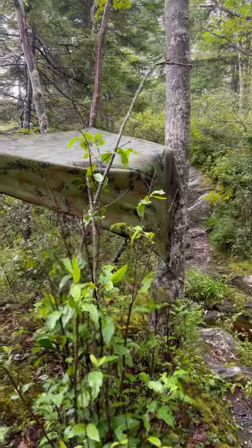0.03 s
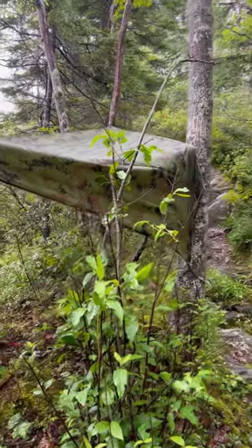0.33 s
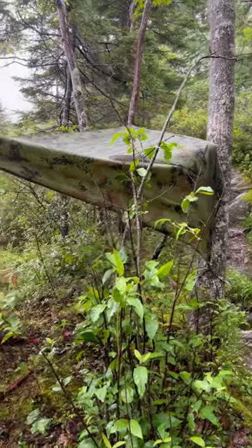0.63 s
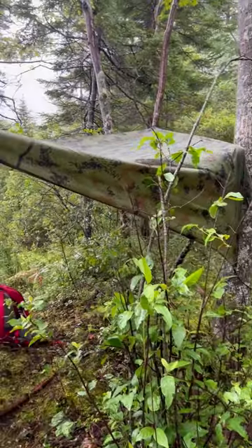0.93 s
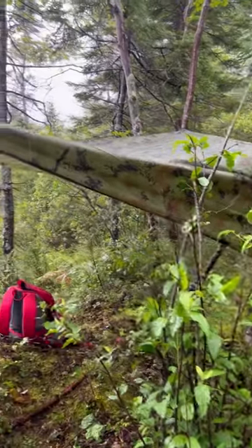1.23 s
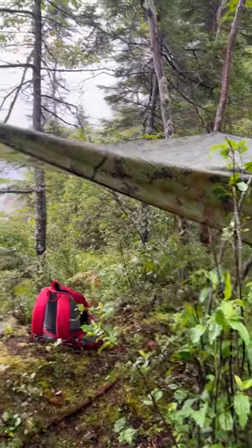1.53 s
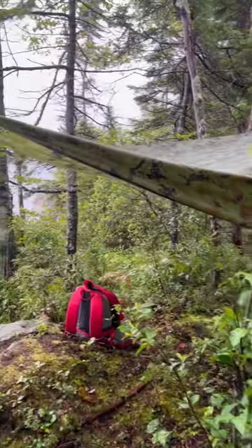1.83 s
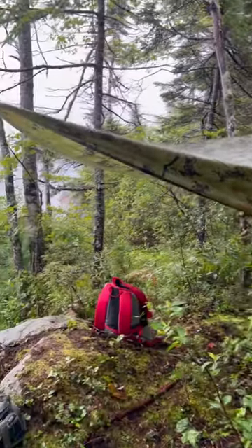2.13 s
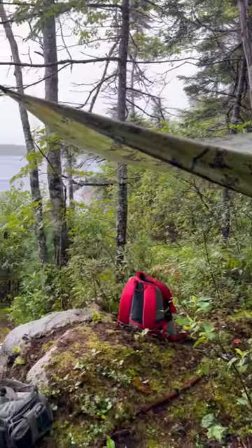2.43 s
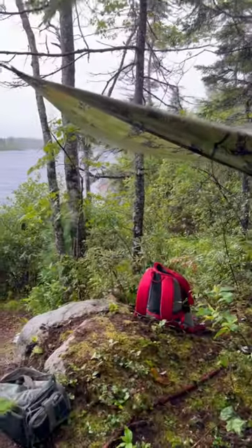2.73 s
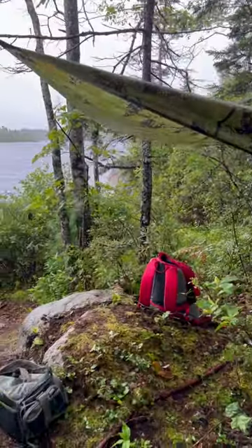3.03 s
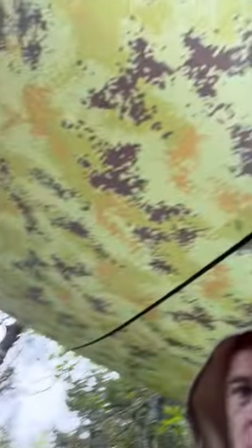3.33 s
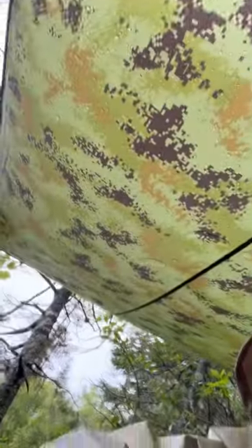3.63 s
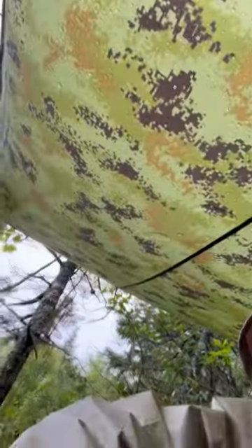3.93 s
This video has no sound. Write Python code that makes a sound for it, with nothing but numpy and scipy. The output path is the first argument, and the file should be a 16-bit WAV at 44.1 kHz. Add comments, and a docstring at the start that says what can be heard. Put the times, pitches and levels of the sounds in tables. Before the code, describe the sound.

Steady rain falls in a forest, a soft hiss with small ticks on leaves and low drips. The microphone moves under a stretched tarp, where the patter turns loud and close, with heavy drops tapping the fabric.

```python
"""Steady rain in a wet forest, heard while walking in under a stretched tarp.
From the start far leaves hiss, near leaves tick, fat drips thud and stirring air rumbles faintly.
Each drop on the taut fabric is a tick and a quick falling chirp, as its short waves outrun its long ones.
Around two seconds a dip glides down through the hiss and the nearing tarp's patter fills out from above.
After three seconds the tarp is overhead: the forest recedes and the patter is loud and close."""
import sys
import numpy as np
from scipy import signal
from scipy.fft import rfft, irfft
from scipy.io import wavfile
from scipy.ndimage import uniform_filter1d

SR = 44100
rng = np.random.default_rng(int(sys.argv[2]) if len(sys.argv) > 2 else 0)


def unload_wav(signal):
    """Save mono or channel-first audio to the path in sys.argv[1] as 16-bit WAV at rate SR, clipped to [-1, 1]."""
    wavfile.write(
        sys.argv[1],
        SR,
        np.round(np.clip(np.atleast_2d(signal).T, -1, 1) * 32767).astype(np.int16),
    )


N = 176400
SNAP_LOW_HZ, CUTOFF_HZ = 9500, 15900
DROP_S = .0025  # nominal length of one impact


def amp(db):
    """Amplitude grows tenfold with every 20 decibels."""
    return 10 ** (np.asarray(db) / 20)


def unit(x):
    """Normalisation to an rms of 1."""
    return x / np.sqrt(np.mean(x ** 2) + 1e-20)


def at_hz(points, hz):
    """Interpolation of a curve on a logarithmic frequency axis."""
    known_hz, value = np.transpose(points)
    return np.interp(np.log(hz + 1), np.log(known_hz + 1), value)


def level(points):
    """An amplitude envelope from points in seconds and dB."""
    return amp(np.interp(np.arange(N) / SR, *np.transpose(points)))


def add(mix, start_s, sound):
    """Superposition: a sound adds to the mix from its start time."""
    part = mix[:, max(round(start_s * SR), 0):][:, :sound.shape[-1]]
    part += sound[..., :part.shape[1]]


def low_cut(x, hz, order):
    """A high-pass filter attenuates the bass below hz."""
    return signal.sosfilt(signal.butter(order, hz, "high", fs=SR, output="sos"), x)


def wash(spectrum, coherence, flicker_db, size, patch_db=2):
    """Partly coherent stereo noise, modulated by drifting spectral patches and a shared flicker."""
    hz = np.fft.rfftfreq(size, 1 / SR)
    frames = N // (size // 4) + 6
    noise = rng.standard_normal((5, frames, len(hz)))
    left, independent = noise[0] + 1j * noise[1], noise[2] + 1j * noise[3]
    patches = unit(uniform_filter1d(uniform_filter1d(noise[4], size=10, axis=0), size=7, axis=1))
    flicker = unit(uniform_filter1d(rng.standard_normal(frames), size=3))[:, None]
    alike = np.clip(at_hz(coherence, hz), -1, 1)
    bins = np.array([left, alike * left + np.sqrt(1 - alike ** 2) * independent])
    bins *= amp(at_hz(spectrum, hz) + patch_db * patches + flicker_db * flicker)
    return unit(signal.istft(bins.transpose(0, 2, 1), nperseg=size, noverlap=size * 3 // 4)[1][:, :N])


def shower(per_s, spread_db):
    """A Poisson process of impacts, most small and a few large."""
    return amp(spread_db * np.minimum(rng.exponential(1, N), 4.5)) * (rng.random(N) < per_s / SR)


def forest():
    """Incoherent summation: impacts on countless far leaves merge into an even hiss."""
    # Envelope of the hiss. Each row: time in seconds, level in dB.
    envelope = [(0,-48.5),(.5,-48.5),(1.3,-51),(3,-49.5),(3.3,-55)]
    # Its spectrum. Each row: frequency in Hz, relative density in dB.
    spectrum = [(100,-12),(170,3),(300,2),(600,-2),(3000,-2.3),(4300,1.5),(6500,-.5),(9000,-3),(12000,-6.5),(16000,-9)]
    # Its width. Each row: frequency in Hz, left-right correlation from -1 to 1.
    coherence = [(290,.75),(640,.25),(3000,.05),(5500,.15),(7500,0),(11500,-.6)]
    return level(envelope) * wash(spectrum, coherence, flicker_db=-.4, size=512)


def leaves(count=30, per_s=1200, low_hz=2340, high_hz=8750, level_db=-60.5):
    """Damped resonance: each struck leaf rings for about one cycle, at its own pitch and place."""
    out, t = np.zeros((2, N)), np.arange(500) / SR
    for hz in np.geomspace(low_hz, high_hz, count):
        tick = np.sin(2 * np.pi * hz * t) * np.exp(-hz * t) * np.sqrt(hz)
        ticks = signal.oaconvolve(shower(per_s / count, spread_db=1), tick)[:N]
        pan = rng.random() * np.pi / 2
        out += [np.cos(pan) * ticks, np.sin(pan) * np.roll(ticks, rng.integers(-10, 10))]
    return amp(level_db) * unit(low_cut(out, low_hz / 2, order=2))


def rumble():
    """Modulated low noise, cut out for about a second as by a wind filter, then louder under the tarp."""
    # Envelope of the rumble. Each row: time in seconds, level in dB.
    envelope = [(0,-64),(.6,-64),(1.07,-65),(1.14,-100),(1.85,-106),(2.1,-62),(2.25,-58.5),(2.5,-59.5),(3.1,-54.5),(3.7,-54.5),(3.83,-53)]
    # Its spectrum. Each row: frequency in Hz, relative density in dB.
    spectrum = [(20,-48),(60,-9.5),(150,-9),(260,-13),(1200,-72)]
    return level(envelope) * wash(spectrum, coherence=[(20, .75), (1000, .75)], flicker_db=2.5, size=2048)


def spray(low_hz, high_hz, t, rise_s=.0004, decay_s=.0005, splash_s=.003, splash_db=-17):
    """A brief impact is broadband: a burst of noise within a band, then a faint splash."""
    band = signal.butter(2, [low_hz, high_hz], "band", fs=SR)
    decay = np.exp(-t / decay_s) + amp(splash_db) * np.exp(-t / splash_s)
    envelope = (1 - np.exp(-t / rise_s)) * decay
    return unit(signal.lfilter(*band, rng.standard_normal(len(t)) * envelope))


def fabric_chirp(pitch, t, sweep_hz=2700, end_hz=280, fall_s=.00095, rise_s=.00045, decay_s=.0014):
    """Dispersion: slower, longer waves cross the fabric last, so the pitch falls; the edges echo it."""
    detune, size = np.exp(.12 * np.clip(rng.standard_normal(2), -2, 2))
    hz = pitch * detune * (end_hz + sweep_hz / (1 + (t / (fall_s * size)) ** 1.524))
    envelope = (1 - np.exp(-t / rise_s)) * np.exp(-t / (decay_s * size))
    wave = np.sin(2 * np.pi * np.cumsum(hz) / SR) * envelope
    delays_s, signs = rng.uniform(.0006, .006, size=4), rng.choice([-1, 1], size=4)
    reflections = sum(sign * np.interp(t - s, t, wave, left=0) for s, sign in zip(delays_s, signs))
    return wave + amp(-12) * reflections


def tarp_drop(chirp_db, tick_db, pitch, echo_db=-6, echo_s=.007):
    """The tarp's impulse response: a crisp tick and a chirp, scattered between fabric and ground."""
    t = np.arange(1600) / SR
    chirp = fabric_chirp(pitch, t)
    tick = spray(2980, 8300, t) + amp(-13.5) * spray(SNAP_LOW_HZ, CUTOFF_HZ, t)
    direct = (amp(chirp_db) * unit(chirp) + amp(tick_db) * unit(tick)) * np.sqrt(DROP_S * SR / len(t))
    lag_s = 8e-6 * rng.standard_normal()  # the two sides hear it at slightly different times
    right = irfft(rfft(direct) * np.exp(-2j * np.pi * np.fft.rfftfreq(len(t), 1 / SR) * lag_s))
    scatter = rng.standard_normal((2, len(t))) * np.exp(-t / echo_s) * (1 - np.exp(-t / .0022))
    scatter *= amp(echo_db) / np.linalg.norm(scatter[0])
    return np.array([direct, right]) + signal.fftconvolve(scatter, direct[None], axes=1)[:, :len(t)]


def patter(spots=36, per_s=1600, pitch_spread=.353, pan_db=3):
    """Shot noise: small drops excite many spots of the tarp, louder as it comes overhead."""
    # Envelope of the patter. Each row: time in seconds, level in dB before shading.
    envelope = [(0,-52),(1.2,-50.5),(1.9,-51.5),(2.2,-51),(3.08,-50),(3.1,-43.5),(3.19,-45.5),(3.28,-40.5),(3.4,-43),(3.48,-41.5),(3.64,-43.5),(3.81,-40.5)]
    # Its spectrum. Each row: frequency in Hz, relative density in dB.
    spectrum = [(40,-53),(120,-2),(350,-0.5),(1900,-2.5),(2500,-3.5),(3600,-6),(4800,-11),(6500,-9),(9500,-15.5),(12000,-23.5),(16000,-52)]
    out = np.zeros((2, N))
    for spot in range(spots):
        drop = tarp_drop(chirp_db=0, tick_db=-3, pitch=np.exp(pitch_spread * rng.standard_normal()))
        pan = amp(pan_db * rng.standard_normal() * np.array([[1], [-1]]))
        impacts = shower(per_s / spots, spread_db=3)
        out += signal.oaconvolve(impacts[None], drop * pan * (-1) ** spot, axes=1)[:, :N]
    bins = rfft(out)
    power = uniform_filter1d((abs(bins) ** 2).mean(0), size=900)
    whitened = bins / np.sqrt(abs(power) + 1e-9)
    colour = amp(at_hz(spectrum, np.fft.rfftfreq(N, 1 / SR)))
    return level(envelope) * unit(irfft(whitened * colour, N))


def shade(x, shelf_db=-6.5, width_oct=.21):
    """Directivity: edge-on, the tarp gives mostly treble; lower bands fill in on walking beneath it."""
    # Upper limit of the weakened band. Each row: time in seconds, frequency in Hz.
    edge = [(1.7,3740),(1.88,3140),(2.03,1840),(2.17,980),(2.6,355),(3.1,121)]
    hz, t, bins = signal.stft(x, SR, nperseg=512)
    below = np.log2(np.interp(t, *np.transpose(edge)) / (hz[:, None] + 1)) / width_oct
    return signal.istft(bins * amp(shelf_db * (1 + np.tanh(below)) / 2), SR)[1][:, :N]


def hollow(x, dip, width_oct):
    """A time-varying notch filter makes the sound hollow around its centre frequency."""
    hz, t, bins = signal.stft(x, SR, nperseg=2048)
    times, centre_hz, depth_db = np.transpose(dip)
    away = np.log2((hz[:, None] + 1) / np.interp(t, times, centre_hz)) / width_oct
    return signal.istft(bins * amp(-np.interp(t, times, depth_db) * np.exp(-away ** 2)), SR)[1][:, :N]


def thuds(rise_s=.0028, decay_cycles=1.45, sag=.22, overtone_db=-14):
    """Heavy damping: a fat drip gives a few low cycles of sagging pitch, with one overtone."""
    # Fat drips. Each row: start in seconds, relative peak level in dB, mid-glide pitch in Hz.
    drips = [(0.047,-48,243),(.162,-51,114),(0.326,-45.5,120),(0.609,-47,179),(.806,-45.5,153),(1.089,-43.5,204),(1.221,-44.5,277),
             (1.326,-42.5,220),(1.88,-46,235),(1.968,-47.5,275),(2.014,-42.5,272),(2.358,-46.5,284),(2.45,-47.5,156),(2.702,-45.5,223),(2.83,-44.5,194),
             (3.142,-40,366),(3.807,-26.5,365),(3.82,-31.5,222),(3.825,-36,105)]
    out, t = np.zeros((2, N)), np.arange(3000) / SR
    for start_s, db, hz in drips:
        phase = 2 * np.pi * np.cumsum(hz * (1 + sag * (2 * np.exp(-t * hz / 2) - 1))) / SR
        envelope = (1 - np.exp(-(t / rise_s) ** 2)) * np.exp(-t * hz / decay_cycles)
        envelope /= envelope.max()
        overtone = amp(overtone_db) * np.sin(phase * rng.uniform(1.4, 2.3))
        add(out, start_s, amp(db) * envelope * (np.sin(phase) + overtone))
    return out


def big_drops(chirp_gain_db=2, tick_gain_db=1):
    """Impulsive excitation: heavy drops from the branches strike the tarp one by one."""
    # Heavy drops. Each row: start in seconds, relative chirp and tick levels in dB, chirp pitch factor.
    strikes = [(0.504,-48.5,-55,1.55),(0.5443,-49,-48,0.43),(1.561,-47,-54,0.5),(2.3556,-45,-46,2.5),(2.5845,-42,-41.5,0.56),(2.7879,-42.5,-50.5,1.28),(2.9632,-45,-44,0.45),(2.978,-48,-48,0.68),
               (3.097,-46,-45.5,1.04),(3.1183,-43,-46,1.13),(3.1321,-37.5,-39,0.59),(3.1422,-34.5,-44,0.804),(3.156,-45,-50,1.16),(3.22,-43,-38.5,0.73),(3.2604,-41.5,-50,0.75),(3.269,-42,-42,1.04),(3.3199,-39.5,-32.5,1.03),(3.333,-37.5,-37.5,0.72),(3.347,-51,-40,0.73),
               (3.4383,-41,-36,0.89),(3.457,-36,-43.5,0.73),(3.483,-42,-38.5,1.1),(3.4987,-38.5,-40,0.83),(3.5302,-41.5,-38.5,1.16),(3.5847,-37,-42,1.7),(3.6001,-44,-46,1.23),(3.6044,-45,-39,0.92),(3.6855,-39.5,-39.5,1.1),(3.7039,-33,-37.5,0.67),
               (3.7187,-34.5,-39.5,0.77),(3.7373,-39.5,-42,0.59),(3.7522,-37,-39.5,0.91),(3.7775,-34.5,-34,0.74),(3.7926,-36,-31.5,0.82),(3.8003,-39,-37,1.1),(3.8053,-29.5,-35.5,0.985),
               (3.811,-31.5,-33,0.64),(3.818,-30,-34,0.915),(3.8251,-31,-41,0.64),(3.829,-43,-45,0.727),(3.8516,-40,-36,0.72),(3.8575,-37,-44,1.6),(3.8855,-32,-33,0.65),(3.8998,-38,-42,0.93),
               (3.9318,-37.5,-37.5,2.15),(3.9364,-36,-43,.7),(3.983,-39.5,-41.5,1.3)]
    out = np.zeros((2, N))
    for start_s, chirp_db, tick_db, pitch in strikes:
        add(out, start_s, tarp_drop(chirp_db + chirp_gain_db, tick_db + tick_gain_db, pitch))
    return out


def near_ticks():
    """Short impacts are rich in treble: a few drops snap on leaves right beside the path."""
    # Bright snaps. Each row: start in seconds, level in dB.
    snaps = [(1.199,-55),(1.4385,-49.5),(2.355,-51)]
    out, t = np.zeros((2, N)), np.arange(round(DROP_S * SR)) / SR
    for start_s, db in snaps:
        add(out, start_s, amp(db) * spray(SNAP_LOW_HZ, CUTOFF_HZ, t))
    return out


def place_tarp(x):
    """Level and phase differences set the tarp's body a little to the right and spread its treble."""
    # Level difference. Each row: frequency in Hz, right minus left in dB.
    balance = [(100,2.5),(1000,2),(2000,1.1),(4000,-0.1)]
    # Phase difference. Each row: frequency in Hz, lead of the left side in radians.
    lead = [(6000,.2),(8270,1.2),(11500,3.1)]
    hz, sides = np.fft.rfftfreq(N, 1 / SR), np.array([[-.5], [.5]])
    return irfft(rfft(x) * amp(at_hz(balance, hz) * sides) * np.exp(-1j * at_hz(lead, hz) * sides), N)


def scene(rain_low_hz=145, thud_low_hz=84.5):
    """Superposition of tarp and forest, coloured by two spectral dips, over the rumble."""
    # A slight hollowness at first. Each row: time in seconds, centre in Hz, depth in dB.
    opening_dip = [(.15,1165,26),(.52,1165,0)]
    # A dip that drifts up, then glides down on nearing the tarp. Each row: as above.
    gliding_dip = [(.6,2500,2.5),(1.62,3500,3.5),(1.85,2950,8),(2.02,1950,5.5),(2.2,1050,0)]
    tarp = big_drops() + low_cut(shade(patter()), rain_low_hz, order=4)
    tarp += low_cut(thuds(), thud_low_hz, order=3)
    rain = place_tarp(tarp) + low_cut(forest(), rain_low_hz, order=6) + leaves() + near_ticks()
    rain = hollow(rain, opening_dip, width_oct=.09)
    return hollow(rain, gliding_dip, width_oct=.16) + rumble()


def record(dry):
    """Band limiting: a steep low-pass filter removes the highest treble."""
    low_pass = signal.firwin(511, CUTOFF_HZ, window=("kaiser", 9), fs=SR)
    return signal.oaconvolve(dry, low_pass[None], "same")


dry = scene()
out = record(dry)
unload_wav(out)
```